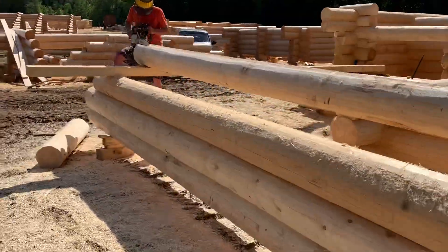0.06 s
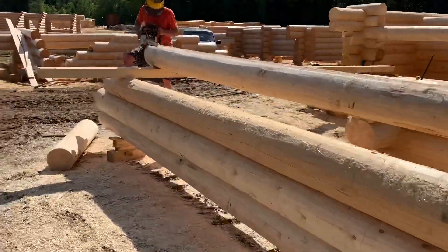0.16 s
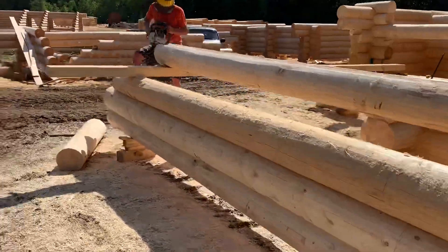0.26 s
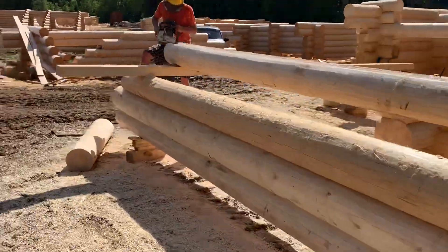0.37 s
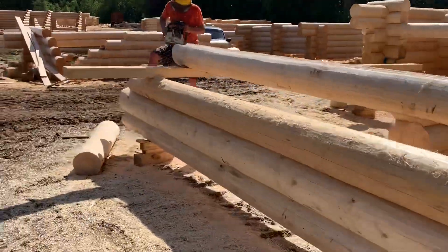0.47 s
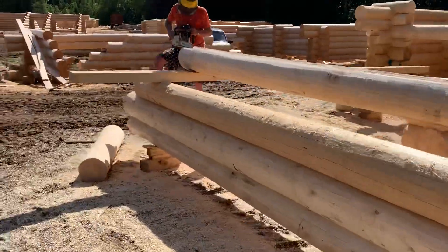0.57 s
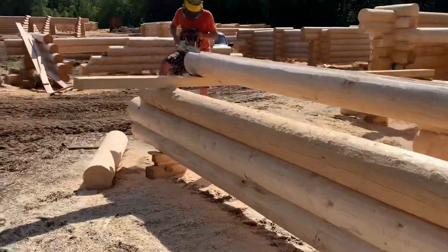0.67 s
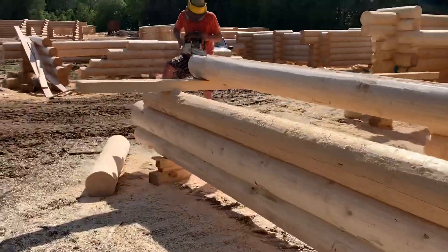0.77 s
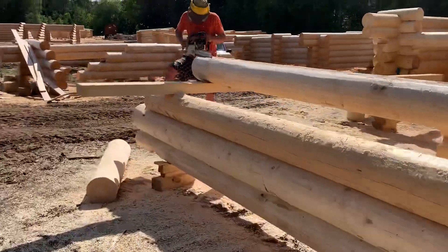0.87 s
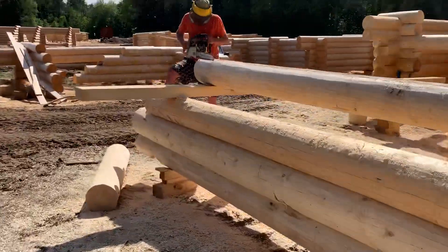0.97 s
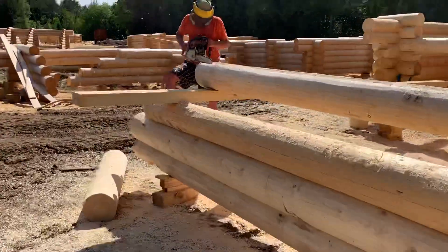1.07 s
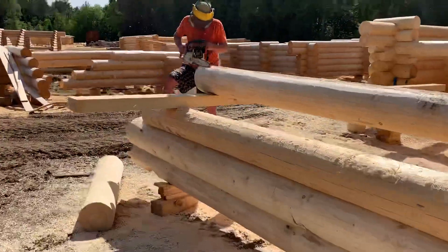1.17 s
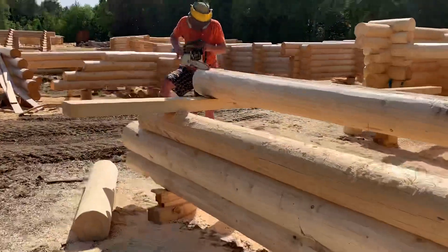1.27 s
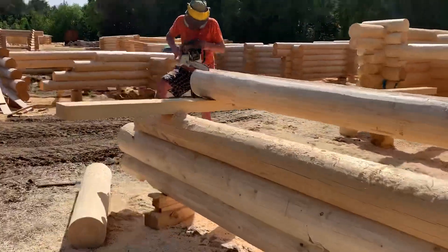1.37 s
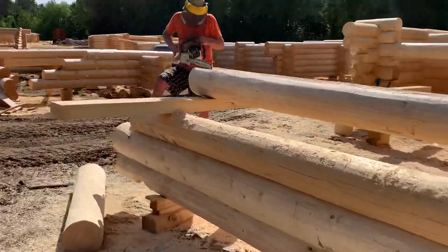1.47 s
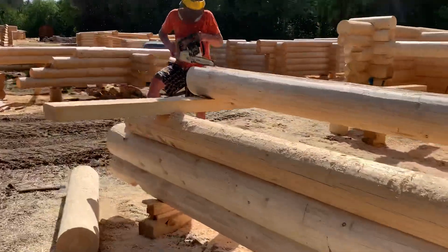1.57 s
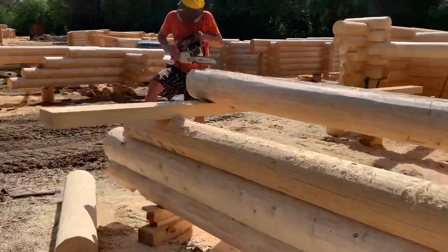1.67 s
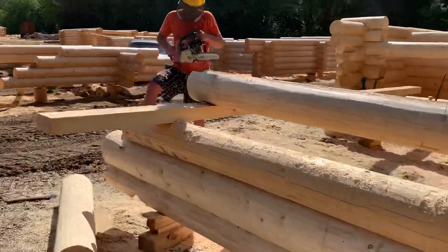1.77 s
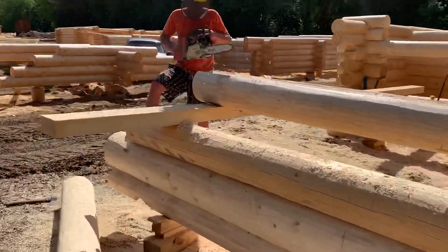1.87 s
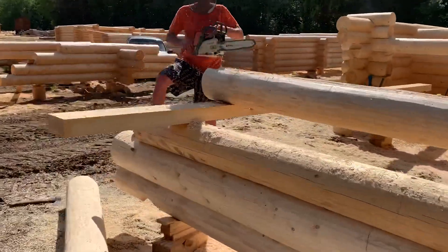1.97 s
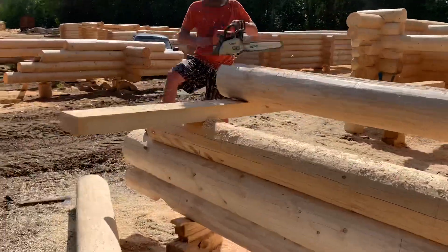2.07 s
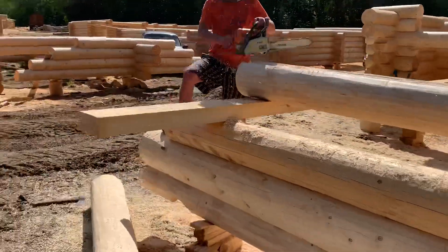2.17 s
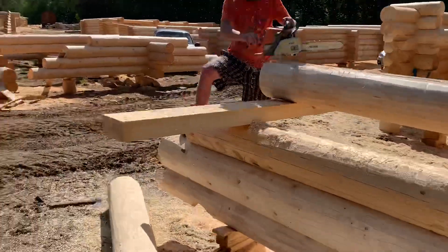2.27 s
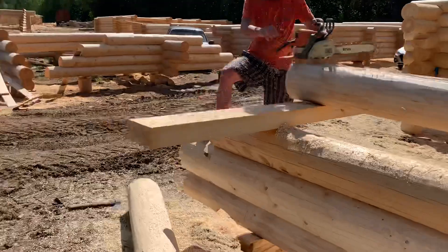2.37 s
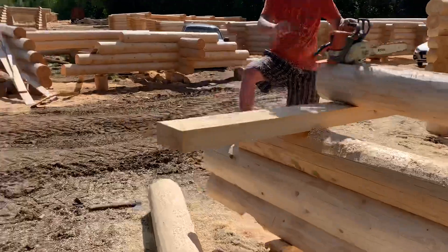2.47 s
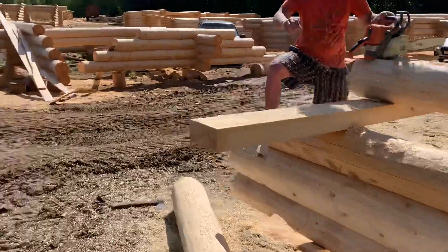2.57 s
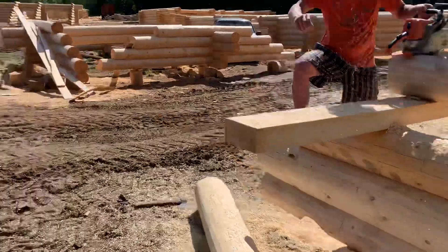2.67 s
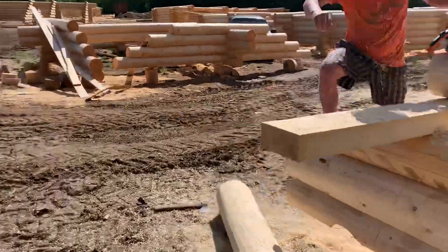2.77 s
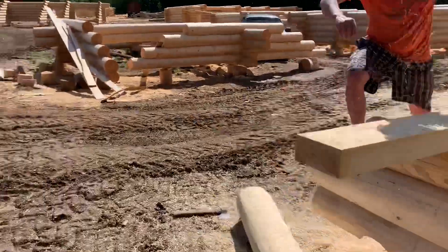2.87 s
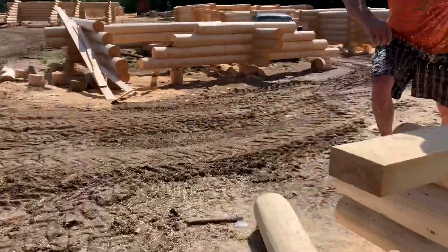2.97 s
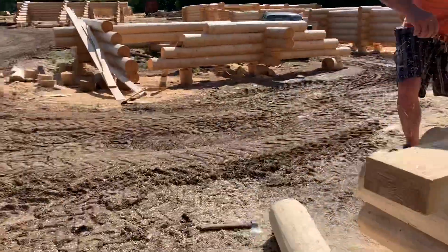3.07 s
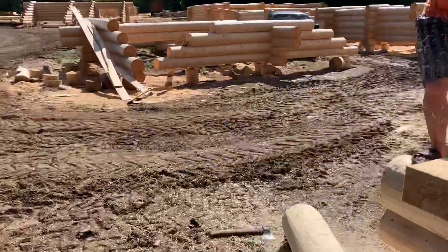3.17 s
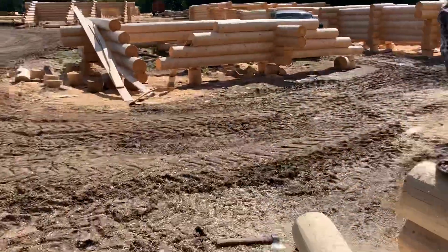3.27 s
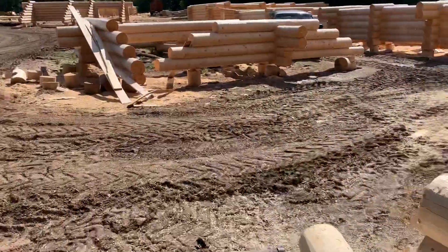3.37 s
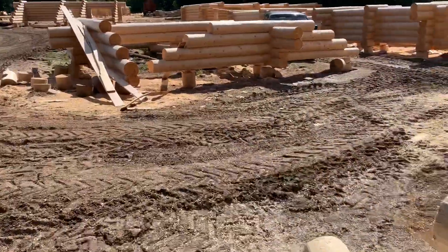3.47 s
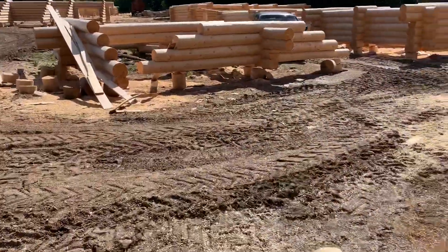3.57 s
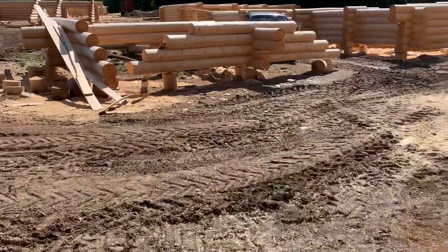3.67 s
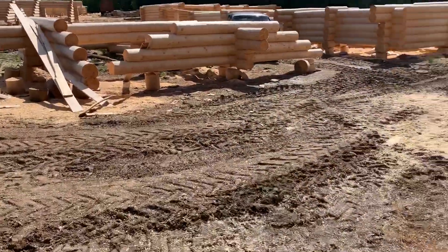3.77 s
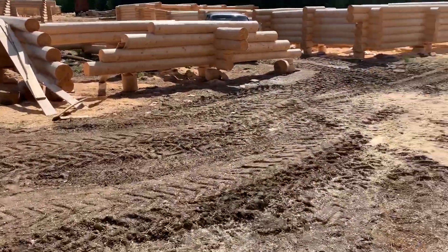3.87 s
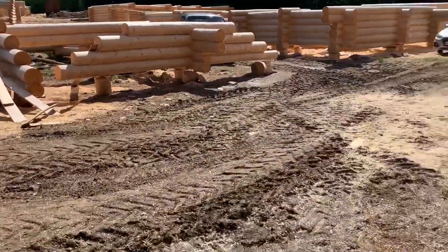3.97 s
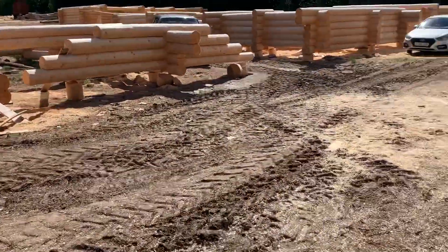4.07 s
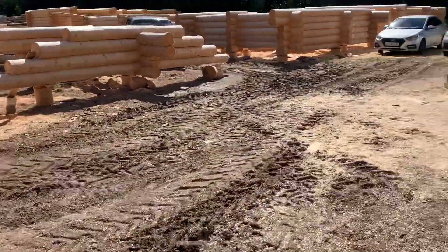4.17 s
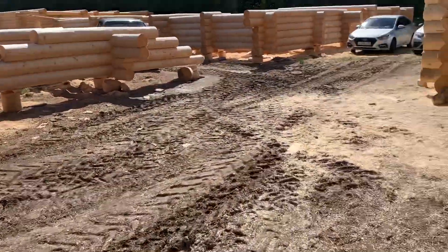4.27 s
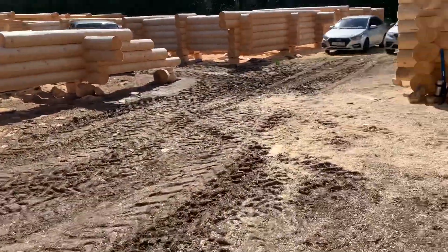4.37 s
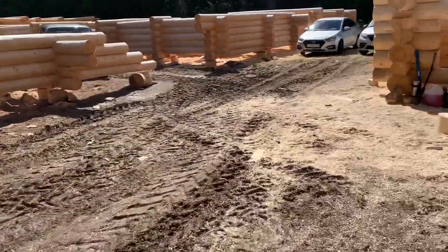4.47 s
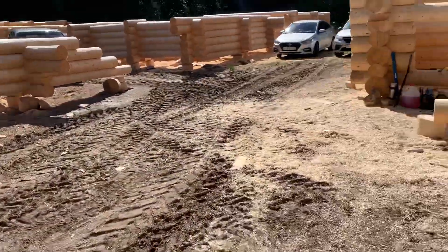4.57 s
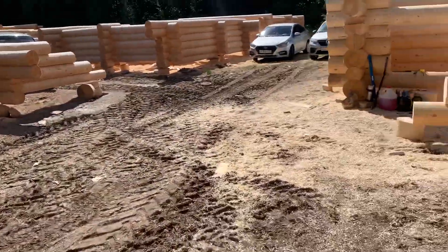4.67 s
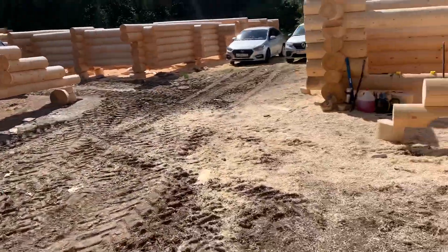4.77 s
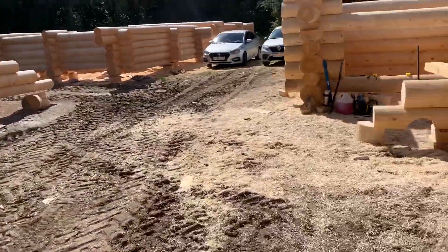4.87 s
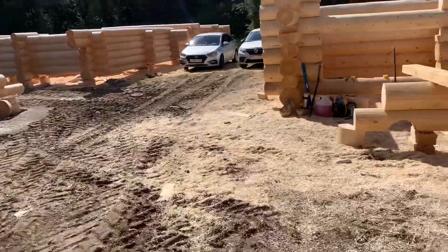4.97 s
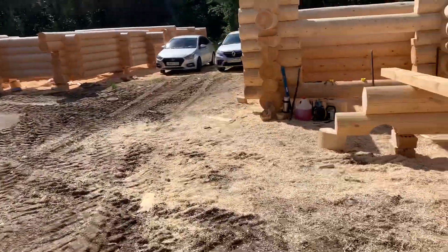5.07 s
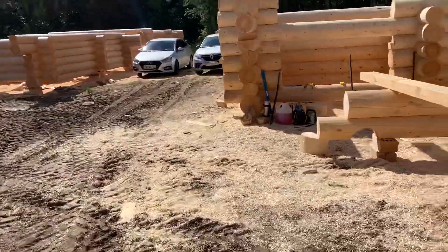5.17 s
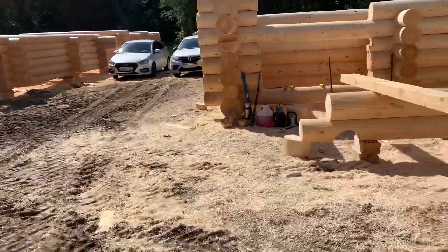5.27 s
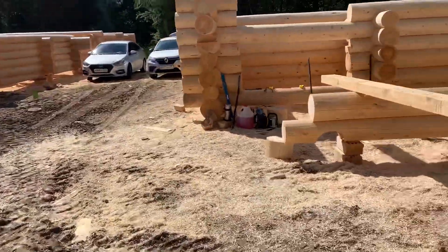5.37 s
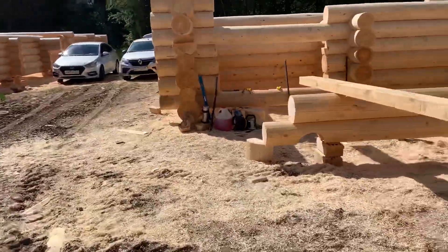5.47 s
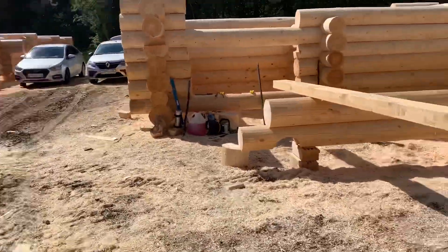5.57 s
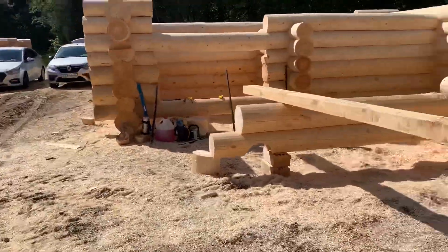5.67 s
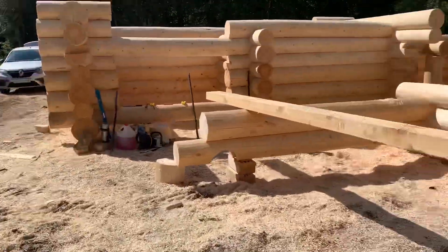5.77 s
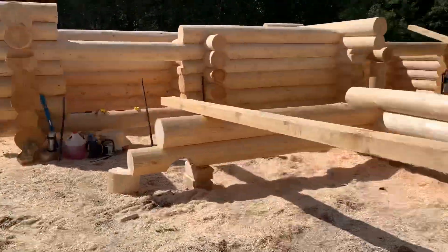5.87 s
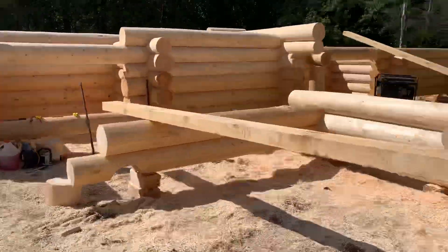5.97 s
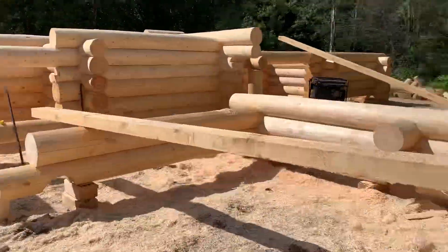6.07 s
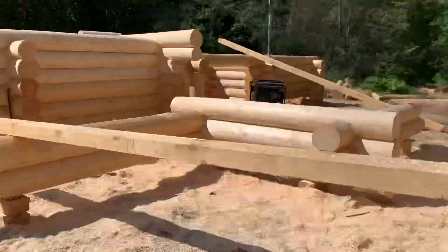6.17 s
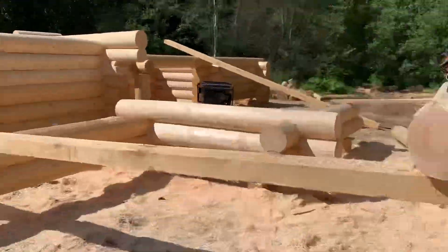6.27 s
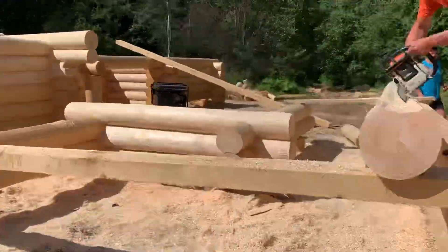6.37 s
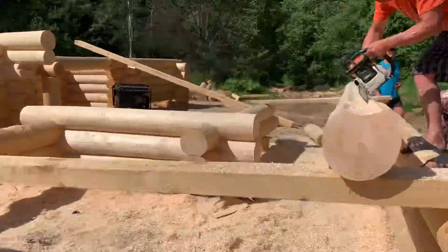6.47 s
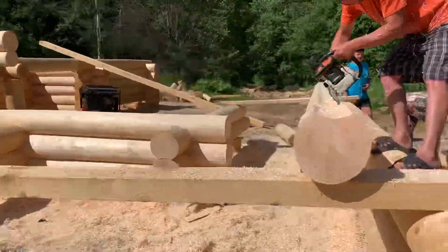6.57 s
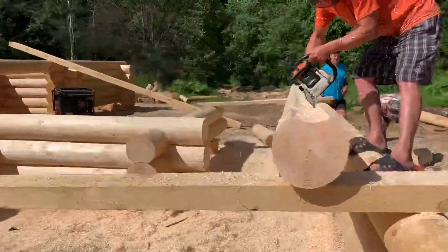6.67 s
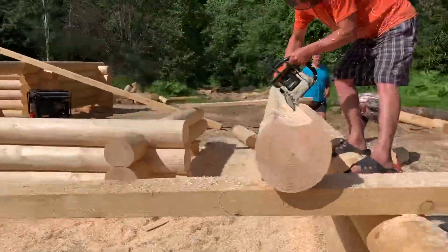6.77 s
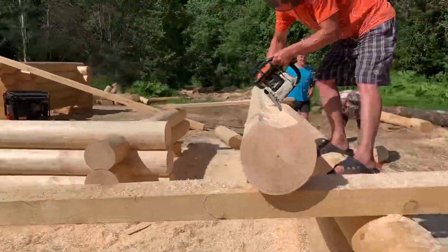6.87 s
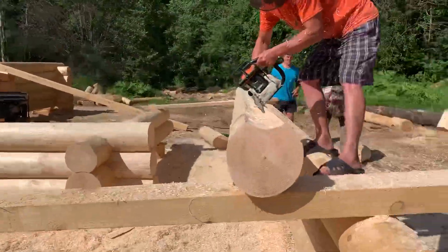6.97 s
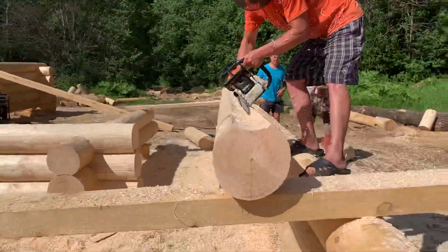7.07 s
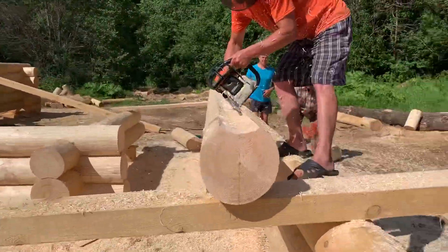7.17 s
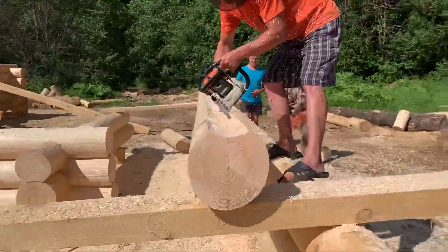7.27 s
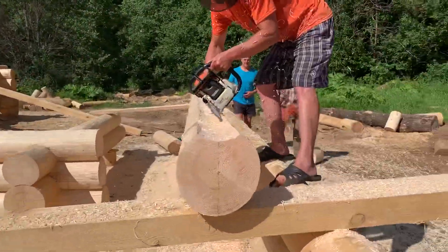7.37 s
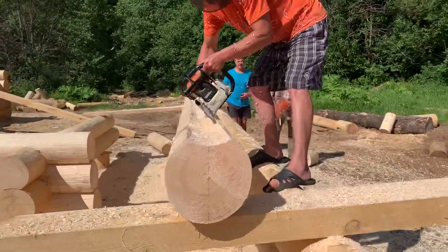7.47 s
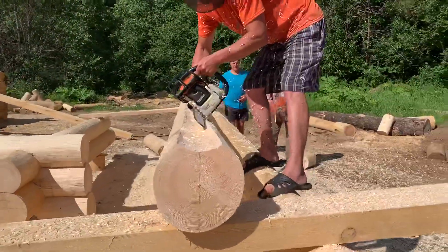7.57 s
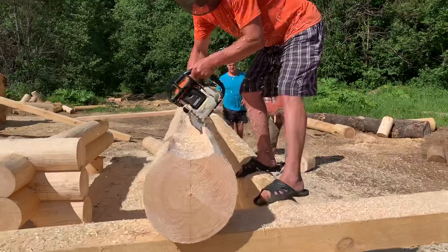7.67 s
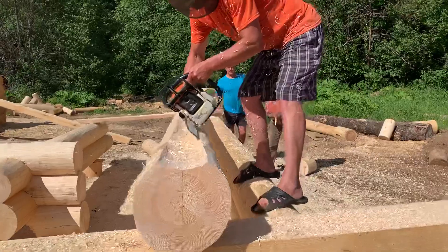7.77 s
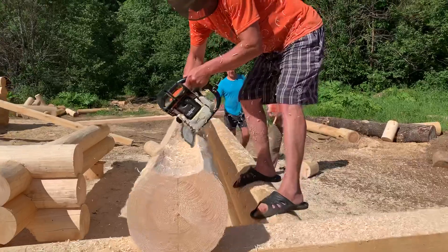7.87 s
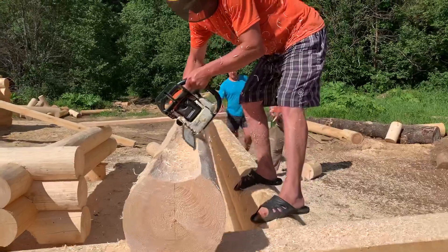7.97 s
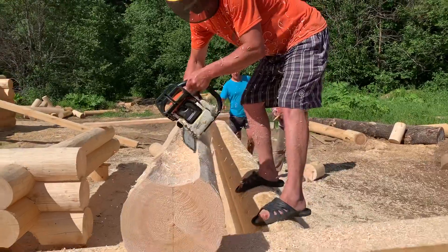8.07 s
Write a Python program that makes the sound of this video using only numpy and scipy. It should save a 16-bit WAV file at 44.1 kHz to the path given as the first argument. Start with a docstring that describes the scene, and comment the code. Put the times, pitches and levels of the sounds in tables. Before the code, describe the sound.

A two-stroke chainsaw races with a buzzing engine and hissing chain, then coasts down, the loose chain slapping the bar. It idles unevenly for about three seconds, thudding and rattling metallically, before revving up, misfiring briefly and cutting into a log close by. The microphone moves around the saw in an outdoor yard, with a short echo and a soft rumble of air.

```python
"""A two-stroke chainsaw in a yard of log walls. It races first: each crank turn blows a pulse through
the muffler and shakes the hissing chain. From 1.4 s it coasts down, the loose chain slapping the bar.
From about 2.7 s it idles, lone firings thudding and jerking the slack chain so the metal rings.
At 6 s it revs up, misfires and sinks into a log close by. Throughout, the logs echo and air rumbles
softly; the listener walks round the saw, so its colour and direction change."""
import sys
import numpy as np
from scipy import signal
from scipy.fft import rfft, irfft, next_fast_len
from scipy.io import wavfile
from scipy.ndimage import uniform_filter1d

SR = 44100
rng = np.random.default_rng(int(sys.argv[2]) if len(sys.argv) > 2 else 0)


def pcm_store(signal):
    """Save signal as 16-bit PCM."""
    levels = np.round(np.clip(np.atleast_2d(signal), -1, 1) * 32767)
    wavfile.write(sys.argv[1], SR, levels.astype(np.int16).T)


N = 358091
T = np.arange(N) / SR
TREBLE_HZ = 7200

# air rumble spectrum: freq_hz, gain_db
AIR_SPECTRUM = [(20, -50), (45, -12), (75, -2), (140, -3), (400, -8), (2000, -53)]
# air rumble, growing as the listener walks: time_s, level_db
AIR_ENVELOPE = [(0, -54), (1.9, -53), (3.0, -44), (5.4, -39), (7.4, -42), (8.12, -54)]
# yard echo decay: freq_hz, t60_s
YARD_DECAY = [(100, 0.17), (1000, 0.18), (5000, 0.078), (15000, 0.33)]
# saw direction: time_s, aside (0 ahead, 1 aside)
SAW_BEARING = [(1.95, 0), (2.7, .57), (3.15, .78), (3.5, 1), (5.85, 1), (6.25, .45), (6.6, .3), (7.2, .08),
               (8.12, .05)]
# left ear relative to right: freq_hz, lead_ahead_rad, lead_aside_rad, ahead_db, aside_db
EAR_RESPONSE = [(100, 0, 0, 0, -1), (500, .05, -1.7, -2, -2), (1500, .5, -3.1, -1, -2),
                (2700, 2.9, -5.2, -1, -1.5), (3500, 1.8, -6.2, 2, -4), (4600, 2.2, -6.5, -3, -6),
                (5600, 1.5, -8.8, -6.5, -13), (5950, 1, -.7, -6, -8), (7000, -1.1, -1.8, 2.5, 0)]
# crank speed: time_s, speed_hz
CRANK_SPEED = [(0, 135.2), (.26, 137), (.41, 146), (.49, 148.7), (.66, 149.3), (.77, 147.5), (1.12, 146.7),
               (1.43, 138.5), (1.664, 126), (2.036, 98.2), (2.486, 77.6), (2.75, 71), (3.45, 66.9),
               (3.96, 66.7), (4.41, 64.5), (6.01, 64.3), (6.246, 103), (6.346, 119.7), (6.5, 133.4),
               (6.62, 135.9), (6.74, 135.3), (6.85, 136.8), (7.09, 145.8), (7.36, 150.3), (7.6, 149.9),
               (8.12, 143.8)]
# lone firings at idle: time_s, pop_db, chain_jerk (log scale)
IDLE_FIRINGS = [(2.1327, 3.5, -6), (2.1976, 5.0, 0), (2.4588, 3.5, -6), (2.5229, 3.5, -2), (2.576, 7.0, -3),
                (2.6434, 7.0, -2), (2.6846, 8.5, -2), (2.7404, 9.0, 1), (2.7963, 9.5, -2), (2.8676, 9.0, 0),
                (2.9108, 9.0, -5), (2.9537, 4.5, -6), (3.0115, 6.5, -5), (3.0843, 3.5, -5),
                (3.1284, 4.0, -3), (3.1876, 5.5, -2), (3.2321, 6.0, -2), (3.2917, 9.0, -4),
                (3.3364, 7.0, -1), (3.3961, 6.0, -1), (3.4558, 4.5, 3), (3.5159, 8.0, 1), (3.576, 9.5, 2),
                (3.6207, 8.0, 1), (3.6951, 6.5, -4), (3.7397, 6.5, -5), (3.7847, 6.0, -1), (3.8594, 5.5, 2),
                (3.9044, 7.5, -2), (3.9641, 6.5, 1), (4.039, 5.5, -5), (4.0993, 3.5, -2), (4.1445, 0.0, -3),
                (4.1906, 3.0, 0), (4.298, 3.0, 0), (4.3755, 3.5, 3), (4.423, 6.5, 0), (4.4694, 1.5, 2),
                (4.5166, 6.5, 5), (4.5789, 1.0, -1), (4.6256, 5.5, 1), (4.6879, 5.5, -3), (4.7344, 6.0, -2),
                (4.7959, 0.5, 3), (4.889, 7.5, 2), (4.9825, 4.5, 3), (5.0296, 5.5, 2), (5.0766, 3.0, -1),
                (5.1547, 6.0, -1), (5.2016, 6.0, 1), (5.2949, 7.0, 2), (5.3569, 6.0, 0), (5.4187, 0.5, -3),
                (5.4816, 5.5, 4), (5.5286, 6.5, 1), (5.5903, 7.0, 13), (5.6361, 6.5, -2), (5.6821, 0.0, -3),
                (5.7287, 5.5, -1), (5.8065, 7.0, 1), (5.8687, 6.0, 1), (5.9157, 3.0, 4), (5.9781, 2.5, 3)]
# chain slap spectrum: freq_hz, gain_db
SLAP_SPECTRUM = [(700, -24.5), (1400, -2), (2000, 5), (2700, -6.5), (3700, -3), (5500, -9.5)]
# colour of the running hiss: freq_hz, gain_db
HISS_SPECTRUM = [(600, -4.5), (1500, -2.5), (2500, -5.5), (3100, -5), (3450, 0), (3700, 5.5), (3980, -6),
                 (4300, 5.5), (4750, -0.5), (5600, 3), (6250, 0), (6520, 7), (6850, -2), (7500, 9),
                 (9000, -14.5), (10000, 4), (11900, 3.5), (14300, -1.5), (15500, -2)]
# relative level of the chain's lower and upper band: time_s, rasp_db, sizzle_db
CHAIN_ENVELOPE = [(0, -33.5, -31.5), (0.3, -36, -33), (0.55, -32, -27), (1.0, -26, -31.5),
                  (1.48, -27.5, -27.5), (1.79, -36.5, -33.5), (2.08, -36.5, -33), (2.25, -40, -27),
                  (2.7, -32, -33), (3.1, -34.5, -35.5), (3.45, -33.5, -44), (3.75, -36, -47),
                  (4.1, -35.5, -36.5), (4.2, -32.5, -32), (4.6, -28.5, -34.5), (5.0, -28.5, -31),
                  (5.5, -31.5, -40.5), (5.8, -32.5, -34), (6.03, -25.5, -40), (6.13, -29, -32),
                  (6.25, -23.5, -30), (6.45, -20, -23), (6.57, -20.5, -20), (6.61, -24, -24),
                  (6.8, -21.5, -22.5), (7.0, -19.5, -25), (7.45, -22, -24.5), (7.7, -22.5, -27.5),
                  (8.12, -23.5, -29)]
# modes of slack chain, clutch and bar: freq_hz, width_hz, gain_db, peak_s, spread_s
METAL_MODES = [(1430, 500, -9, 4.7, 0.44), (1960, 120, -5, 5.5, 0.5), (2040, 180, 4.5, 3.5, .65),
               (3720, 180, 4, 2.8, .5), (2290, 190, 8.5, 5.2, 0.72), (2940, 64, 11.5, 5.27, 0.77),
               (3350, 170, 8.5, 4.86, 0.38), (3440, 49, 7, 3, 0.89), (3680, 230, 8, 4.57, 0.27),
               (4420, 120, 10.5, 3, 0.61), (4895, 86, 8, 3.2, 1.3), (5600, 570, 11, 4.28, 0.79),
               (6330, 54, 12.5, 4.3, 0.84), (6840, 530, 7.5, 4.6, 2.4), (10100, 450, 2, 4, 2.1),
               (11940, 1300, 4, 4.5, 2.7), (14400, 990, 0, 4, 3)]
# full-throttle whine: time_s, level_db
WHINE_ENVELOPE = [(0, -46), (.5, -39), (1.4, -31), (1.9, -62), (6.1, -70), (6.25, -34), (6.5, -30),
                  (7.1, -31.5), (8.12, -31)]
# whine spectrum: freq_hz, gain_db
WHINE_SPECTRUM = [(1000, -21), (1400, 3), (2000, 6.5), (2400, 6.5), (2750, -36), (3200, 9), (3700, 5),
                  (4400, 5.5), (5000, -11), (6500, -7), (7500, -13)]
# swelling crank harmonics: peak_s, harmonic, rise_s, fall_s, gain_db
HUM_SWELLS = [(.3, 6, .5, .35, 1), (.45, 9, .4, .4, -1), (.5, 12, .15, .3, -4), (1.15, 10, .25, .3, 2),
              (1.45, 5, .17, .23, 12), (1.7, 2, .5, .55, -2), (2.05, 5, .2, .25, 3), (2.15, 6, .2, .45, 0),
              (2.5, 7, .15, .2, 2), (2.9, 1, .12, .15, 8), (5.3, 1, .7, .7, -3), (4.2, 6, 1, .9, 3.5),
              (4.6, 4, .9, .8, 0), (4.7, 8, .6, .6, -6), (5.05, 5, 1.2, .5, 6.5), (3.95, 8, .4, .5, -4),
              (5.85, 4, .25, .2, 1), (6.07, 3, .09, .11, 5), (6.14, 1, .06, .12, 0), (6.16, 5, .12, .1, 4),
              (6.33, 6, .06, .06, 6), (6.44, 4, .12, .12, 5), (6.6, 14, .12, .3, 4), (6.7, 7, .25, .3, -2),
              (7.2, 12, .25, .25, 1), (7.2, 15, .15, .2, 0), (7.45, 3, .4, .2, -3)]
# exhaust colour per engine state 0-5: freq_hz, gain_db
EXHAUST_RACING = [(60, -18), (145, 20), (295, 12.5), (450, 10), (590, 10), (750, 9.5), (900, 11),
                  (1150, 2.5), (1400, 8), (1600, -2.5), (1830, 13.5), (2100, 4), (2400, 2), (3100, -7),
                  (6000, -7.5)]
EXHAUST_COASTING = [(50, -22), (100, 0.5), (225, 9.5), (360, -7), (470, 2.5), (610, 6.5), (740, -6.5),
                    (850, -1.5), (1050, -8), (1950, -4), (2900, -13), (6000, -22)]
EXHAUST_IDLING = [(30, -70), (64, -5.5), (95, -24), (128, -5), (185, 2.5), (240, 1), (290, -4.5), (322, 1),
                  (360, -1.5), (420, -8.5), (515, -1.5), (720, -8), (1100, -11.5), (1500, -7), (1900, -4.5),
                  (3000, -14.5), (6000, -55)]
EXHAUST_REVVING = [(40, -21), (80, 0.5), (135, 0), (170, 0), (245, 6.5), (360, -2.5), (480, 2.5), (800, 1),
                   (1020, -1), (1350, -11.5), (1900, -7.5), (2500, -7), (3300, -16), (6000, -29)]
EXHAUST_BITING = [(60, -27), (136, 11.5), (275, 1.5), (410, 1.5), (680, 1.5), (880, 7), (1100, -10),
                  (1340, -1), (1560, -14), (1830, 2.5), (2040, -7.5), (2400, 1), (3200, -17.5), (6000, -34)]
EXHAUST_CUTTING = [(60, -31), (148, 6.5), (298, -21.5), (440, -8.5), (595, 0.5), (745, -9), (890, -1),
                   (1150, -20), (1345, -4), (1530, -12), (1790, -2), (2280, -2), (3000, -34), (6000, -16.5)]
# engine state: time_s, state (0 racing to 5 cutting)
ENGINE_STATE = [(1.3, 0), (1.7, 1), (2.35, 1), (2.95, 2), (5.99, 2), (6.02, 3), (6.45, 3), (6.6, 4),
                (6.92, 4), (7.15, 5)]
# exhaust turbulence per state, stronger with the throttle shut: gain_db
PUFF_DB = [-8, -4, -5, -16, -11, -11]
# upper exhaust band per state: gain_db
SNARL_DB = [3, -1.5, -1.5, 7, 6, 0.5]
# a missed turn, then a bang, on fresh throttle: time_s, bang_db
MISFIRE_BANGS = [(6.47, 4), (6.567, 6), (6.585, 7)]
# thud and gas cough of a lone firing: freq_hz, gain_db
THUD_SPECTRUM = [(50, -30), (110, -13), (170, 12.5), (260, 0), (550, -2), (900, -5), (1300, -18),
                 (4000, -42)]
COUGH_SPECTRUM = [(100, -20), (300, -7), (600, -6), (900, -14), (1400, -34), (4000, -55)]
# exhaust level, set by throttle and distance: time_s, level_db
EXHAUST_ENVELOPE = [(0, -32.5), (0.25, -29.5), (0.5, -28), (1.0, -27), (1.55, -27.5), (2.05, -32.5),
                    (2.6, -33), (3.0, -32.5), (3.65, -32.5), (4.3, -31.5), (4.85, -28), (5.3, -29),
                    (5.6, -30.5), (5.99, -30.5), (6.08, -25), (6.2, -24), (6.35, -23), (6.48, -20.5),
                    (6.575, -20.5), (6.61, -24.5), (6.8, -24.0), (7.05, -22), (7.45, -21.5), (7.7, -24),
                    (8.12, -24)]


def gain_of(db):
    """Decibels to amplitude."""
    return 10 ** (np.asarray(db) / 20)


def curves(rows):
    """Value columns of a time table, per sample."""
    time_s, *columns = np.transpose(rows)
    return [np.interp(T, time_s, column) for column in columns]


def at_freq(points, hz):
    """Table lookup over log frequency."""
    freq_hz, value = np.transpose(points)
    return np.interp(np.log(hz + 1), np.log(freq_hz), value)


def swell(peak_s, rise_s, fall_s):
    """Asymmetric bell, peak 1."""
    return np.exp(-((T - peak_s) / np.where(T < peak_s, rise_s, fall_s)) ** 2)


def unit_rms(x):
    """Scale to rms 1."""
    return x / np.sqrt(np.mean(x ** 2) + 1e-20)


def levelled(x, level_db, size=6000):
    """Follow a level curve, keeping fast flutter."""
    power = uniform_filter1d(uniform_filter1d(x ** 2, size), size)
    return gain_of(level_db) * x / np.sqrt(abs(power) + 1e-14)


def coloured(x, spectrum, size=4096):
    """Minimum-phase filter: rings after each blow."""
    log_gain = np.log(gain_of(at_freq(spectrum, abs(np.fft.fftfreq(size, 1 / SR)))))
    ring = np.fft.ifft(np.exp(np.conj(signal.hilbert(log_gain)))).real
    return signal.oaconvolve(x, ring[:size // 2])[:N]


def split(x, hz, order=8):
    """Crossover: (low, high)."""
    size = next_fast_len(N, real=True)
    low = irfft(rfft(x, size) / (1 + (np.fft.rfftfreq(size, 1 / SR) / hz) ** order), size)[:N]
    return low, x - low


def noise():
    """White noise, rms 1."""
    return rng.standard_normal(N)


def drift(hz):
    """Low-passed random wander, rms 1."""
    return unit_rms(split(noise(), hz, order=4)[0])


def decay(x, tau_s):
    """Exponential tail on each click."""
    return signal.lfilter([1], [1, -np.exp(-1 / (tau_s * SR))], x)


def clicks(times_s, heights):
    """Band-limited clicks at exact times."""
    index = np.round(times_s * SR).astype(int)[:, None] + np.arange(-8, 9)
    offset = index - times_s[:, None] * SR
    shape = np.sinc(offset) * np.sinc(offset / 9)
    return np.bincount(np.clip(index, 0, N - 1).ravel(), (heights[:, None] * shape).ravel(), N)


def air():
    """Rumble of moving air, partly common to both ears."""
    left, right, common = (unit_rms(coloured(noise(), AIR_SPECTRUM)) for _ in range(3))
    level_db = curves(AIR_ENVELOPE)[0] + 2 * drift(hz=1.9)
    return gain_of(level_db) * unit_rms(np.array([left, right]) + common)


def yard_echo(x, taps_per_s=2000, gap_s=0.006):
    """Scatter off the log walls, different at each ear."""
    taps = rng.standard_normal((2, SR // 2)) * (rng.random((2, SR // 2)) < taps_per_s / SR)
    taps[:, :round(gap_s * SR)] = 0
    hz, time_s, spectra = signal.stft(taps, SR, nperseg=256)
    tail = signal.istft(spectra * gain_of(-60 * time_s / at_freq(YARD_DECAY, hz)[:, None]), SR)[1]
    tail /= np.linalg.norm(tail, axis=1, keepdims=True)
    return signal.fftconvolve(x[None], tail, axes=1)[:, :N]


def rebound(x, delay_s, feedback):
    """All-pass: bounces between logs smear each pulse without colouring it."""
    size = next_fast_len(N + SR, real=True)
    lag = np.exp(-2j * np.pi * np.fft.rfftfreq(size, 1 / SR) * delay_s)
    return irfft(rfft(x, size) * (feedback + lag) / (1 + feedback * lag), size)[:N]


def ears(x, treble_lag_s=0.000185):
    """Phase and balance follow the saw's bearing; in the treble the left just lags."""
    hz, time_s, spectra = signal.stft(x, SR, nperseg=1024, noverlap=768)
    hz = hz[:, None]
    aside = np.interp(time_s, *np.transpose(SAW_BEARING))
    freq_hz, *columns = np.transpose(EAR_RESPONSE)
    ahead_rad, aside_rad, ahead_db, aside_db = (np.interp(hz, freq_hz, column) for column in columns)
    low = hz < TREBLE_HZ
    treble_rad = 2 * np.pi * (1 - hz * treble_lag_s)
    lead_rad = np.where(low, ahead_rad + aside * (aside_rad - ahead_rad), treble_rad)
    balance = gain_of(low * (ahead_db + aside * (aside_db - ahead_db)))
    pair = np.array([balance * np.exp(0.5j * lead_rad), np.exp(-0.5j * lead_rad)])
    pair *= np.sqrt(2 / (1 + balance ** 2))
    return signal.istft(spectra * pair, nperseg=1024, noverlap=768)[1][:, :N]


def crank_hz():
    """Speed per sample: the flywheel rounds each change (cubic, no overshoot)."""
    time_s, hz = np.transpose(CRANK_SPEED)
    span_s = np.diff(time_s)
    slope = np.diff(hz) / span_s
    tangent = np.r_[0, 2 * np.maximum(slope[:-1] * slope[1:], 0) / (slope[:-1] + slope[1:]), slope[-1]]
    k = np.searchsorted(time_s[1:-1], T)
    u = (T - time_s[k]) / span_s[k]
    bend = u * (1 - u) * ((1 - u) * (tangent[k] - slope[k]) - u * (tangent[k + 1] - slope[k]))
    return hz[k] + span_s[k] * (u * slope[k] + bend)


def crank_times(firing_s, wander=0.00191, jitter_s=0.000014):
    """Time of each turn, aligned so idle firings fall on top dead centre."""
    turns = np.cumsum(crank_hz() * (1 + wander * drift(hz=14))) / SR
    lead_turns = np.unwrap(np.interp(firing_s, T, turns) % 1, period=1)
    turns -= np.interp(T, firing_s, lead_turns)
    turn_s = np.interp(np.arange(np.ceil(turns[0]), turns[-1]), turns, T)
    return turn_s + jitter_s * noise()[:len(turn_s)]


def chain_slap(turn_s, level_db=-35, ring_s=0.02):
    """Throttle shut: the loose chain hits the bar on every turn."""
    hits = clicks(turn_s, gain_of(rng.uniform(-16.8, 4, N)[:len(turn_s)]))
    clatter = unit_rms(coloured(decay(hits, ring_s) * noise(), SLAP_SPECTRUM))
    return gain_of(level_db) * swell(peak_s=2, rise_s=0.3, fall_s=1) * clatter


def chain_hiss(turn_s, shake, burst_s=0.0085, grain_db=4):
    """Grainy hiss of links and cutters, surging each turn."""
    grains = noise() * gain_of(grain_db * np.tanh(drift(hz=1040)))
    surge = uniform_filter1d(decay(clicks(turn_s, shake), burst_s), size=50)
    return unit_rms(coloured(grains * (1 + surge), HISS_SPECTRUM))


def chain_rattle(turn_s, shake, rattle_s=0.013, early_s=0.0054, floor=0.097, off_axis_db=-11):
    """Knocks ring slack chain, clutch and bar; each mode carries best to one side of the saw."""
    bursts = uniform_filter1d(decay(clicks(turn_s - early_s, shake), rattle_s), size=130)
    knocks = noise() * (floor + bursts)
    ringing = 0.3 * split(knocks, 3750)[1]
    for hz, width_hz, gain_db, peak_s, spread_s in METAL_MODES:
        facing_db = off_axis_db * (1.5 - swell(peak_s, spread_s, spread_s))
        mode = signal.lfilter(*signal.iirpeak(hz, hz / width_hz, SR), knocks)
        ringing += gain_of(gain_db + facing_db) * mode
    return unit_rms(ringing)


def chain(turn_s, fired, jerk, clutch_hz=68, clutch_span_hz=16):
    """Hiss while the clutch grips; at idle, rattle jerked by each firing."""
    shake = gain_of(rng.uniform(-3.5, 3.5, N)[:len(turn_s)])
    hiss = chain_hiss(turn_s, shake)
    shake[fired] = gain_of(2 + 0.7 * jerk)
    rattle = chain_rattle(turn_s, shake)
    engaged = np.clip((crank_hz() - clutch_hz) / clutch_span_hz, 0, 1)
    rasp, sizzle = split(engaged * hiss + (1 - engaged) * rattle, 10150)
    rasp_db, sizzle_db = curves(CHAIN_ENVELOPE)
    return levelled(rasp, rasp_db) + levelled(sizzle, sizzle_db + 1)


def whine(turns, harmonics=range(8, 54), fade_db=4, fade_hz=2.5, roughness=0.51):
    """Sharp full-throttle blasts ring in upper harmonics, each fading as saw and listener move."""
    frame_s, speed_hz = T[::441], crank_hz()[::441]
    knot_s = np.arange(40) / fade_hz
    tones = np.zeros(N)
    for k in harmonics:
        fade = np.interp(frame_s, knot_s, rng.standard_normal(len(knot_s)))
        gain = gain_of(at_freq(WHINE_SPECTRUM, k * speed_hz) + fade_db * fade)
        tones += np.interp(T, frame_s, gain) * np.cos(2 * np.pi * (k * turns + rng.random()))
    return levelled(tones * (1 + roughness * drift(hz=70)), curves(WHINE_ENVELOPE)[0])


def hum(turns):
    """Single crank harmonics swell and fade, scaled to those of a unit pulse train."""
    tones = sum(gain_of(gain_db) * swell(peak_s, rise_s, fall_s) * np.cos(2 * np.pi * k * turns)
                for peak_s, k, rise_s, fall_s, gain_db in HUM_SWELLS)
    return 2 * crank_hz() / SR * tones


def pressure_pulses(turn_s, idle_uneven_db=3, uneven_db=2.5, stumble_s=0.00009):
    """One pulse per turn; the idle stumbles, a misfire skips a turn and bangs."""
    idle = (turn_s > IDLE_FIRINGS[0][0]) & (turn_s < IDLE_FIRINGS[-1][0])
    push = gain_of(np.where(idle, idle_uneven_db, uneven_db) * noise()[:len(turn_s)])
    for time_s, bang_db in MISFIRE_BANGS:
        turn = abs(turn_s - time_s).argmin()
        push[turn - 1], push[turn] = 0, gain_of(bang_db)
    return clicks(turn_s + stumble_s * idle * noise()[:len(turn_s)], push)


def exhaust_colour(drive, state):
    """Colour crossfaded by engine state, then smeared by the logs."""
    spectra = [EXHAUST_RACING, EXHAUST_COASTING, EXHAUST_IDLING,
               EXHAUST_REVVING, EXHAUST_BITING, EXHAUST_CUTTING]
    parts = [coloured(drive * np.maximum(1 - abs(state - k), 0), spectrum)
             for k, spectrum in enumerate(spectra)]
    # the low growl of the rev-up skips the long rebounds, so its pulses stay distinct
    growl, rev_treble = split(parts.pop(spectra.index(EXHAUST_REVVING)), 1050)
    parts.append(rebound(rev_treble, delay_s=0.0037, feedback=0.57))
    scattered = rebound(sum(parts), delay_s=0.0059, feedback=0.7)
    return rebound(growl + scattered, delay_s=0.0009, feedback=0.6)


def snarl_gain(state):
    """Upper exhaust band: set per state, turned down around 2-4.5 s and on fresh throttle."""
    state_db = np.interp(state, np.arange(len(SNARL_DB)), SNARL_DB)
    dip_db = -9 * swell(peak_s=2.5, rise_s=0.8, fall_s=2)
    throttle_db = -9 * swell(peak_s=6.05, rise_s=0.08, fall_s=0.2)
    return gain_of(state_db + dip_db + throttle_db)


def exhaust(turn_s, turns, pops, puff_s=0.15, cough_s=0.019):
    """Pulses and turbulent puffs leave the muffler; lone firings add a thud and a cough of gas."""
    state = curves(ENGINE_STATE)[0]
    pulses = pressure_pulses(turn_s) + gain_of(-12) * pops
    puffs = split(decay(pulses, puff_s) * noise(), 2200, order=1)[1] / np.sqrt(puff_s * SR / 2)
    puff_db = np.interp(state, np.arange(len(PUFF_DB)), PUFF_DB)
    drive = pulses + hum(turns) + gain_of(puff_db) * puffs
    thuds = gain_of(-7) * coloured(pops, THUD_SPECTRUM)
    coughs = gain_of(-26) * coloured(decay(pops, cough_s) * noise(), COUGH_SPECTRUM)
    boom, snarl = split(coughs - thuds - exhaust_colour(drive, state), 1100)
    return levelled(boom + snarl_gain(state) * snarl, curves(EXHAUST_ENVELOPE)[0])


def scene(chain_db=-3.5, exhaust_echo_db=-10.5, rasp_echo_db=-4, sizzle_echo_db=-12):
    """Saw, yard echo and air, in stereo."""
    firing_s, pop_db, jerk = np.transpose(IDLE_FIRINGS)
    turn_s = crank_times(firing_s)
    turns = np.interp(T, turn_s, np.arange(len(turn_s)))
    fired = abs(turn_s[:, None] - firing_s).argmin(0)
    pops = clicks(turn_s[fired], gain_of(pop_db))
    gas = exhaust(turn_s, turns, pops) + whine(turns)
    metal = gain_of(chain_db) * chain(turn_s, fired, jerk) + chain_slap(turn_s)
    rasp, sizzle = split(metal, TREBLE_HZ)
    echo_send = gain_of(exhaust_echo_db) * split(gas, 250, order=4)[1]
    echo_send += gain_of(rasp_echo_db) * rasp + gain_of(sizzle_echo_db) * sizzle
    return ears(gas + metal) + yard_echo(echo_send) + air()


def record(dry, cutoff_hz=15850):
    """Steep low-pass."""
    lowpass = signal.firwin(511, cutoff_hz, window=("kaiser", 9), fs=SR)
    return signal.oaconvolve(dry, lowpass[None], "same")


dry = scene()
out = record(dry)
pcm_store(out)
```